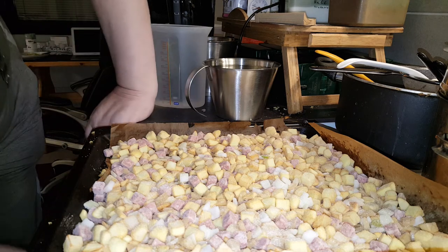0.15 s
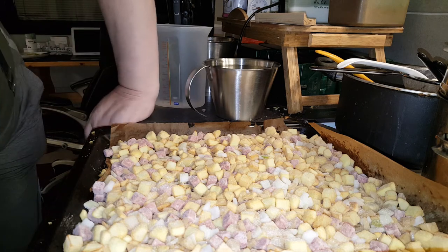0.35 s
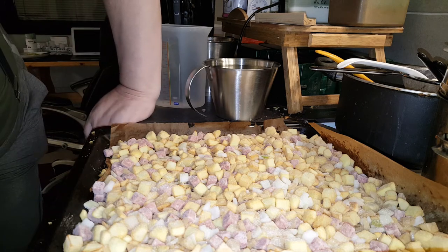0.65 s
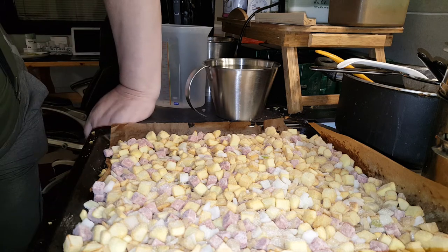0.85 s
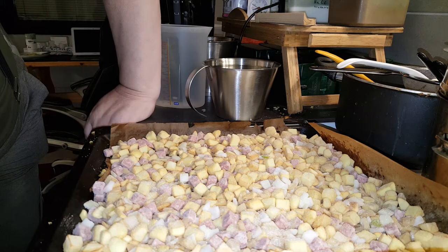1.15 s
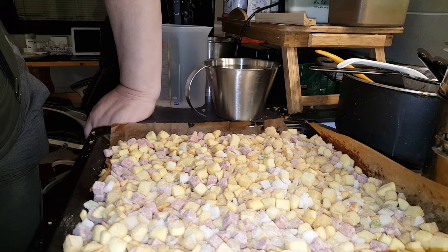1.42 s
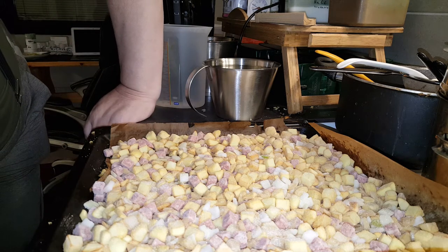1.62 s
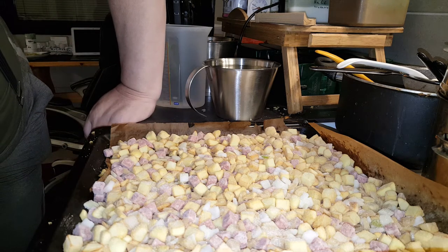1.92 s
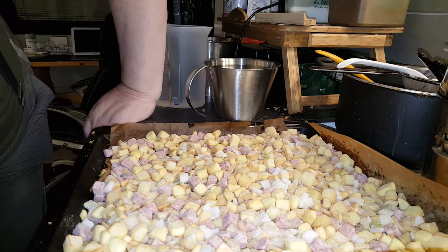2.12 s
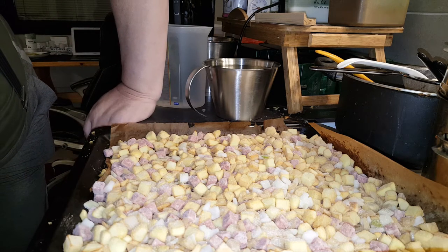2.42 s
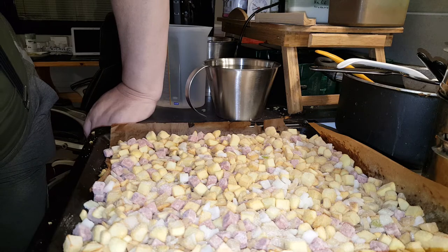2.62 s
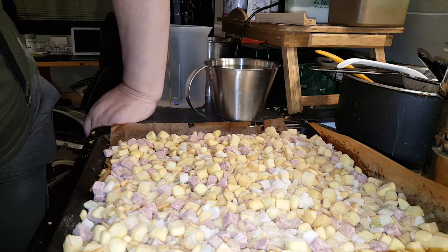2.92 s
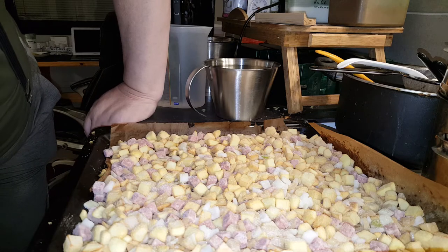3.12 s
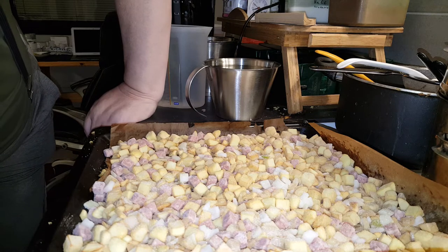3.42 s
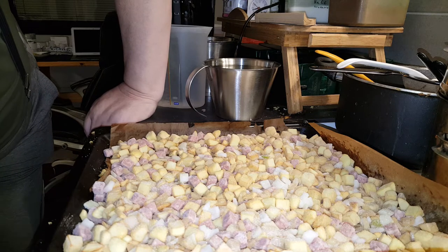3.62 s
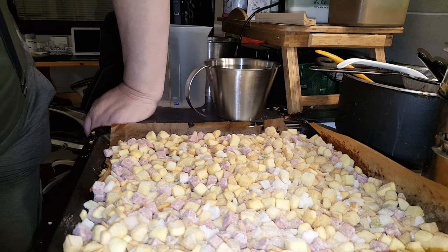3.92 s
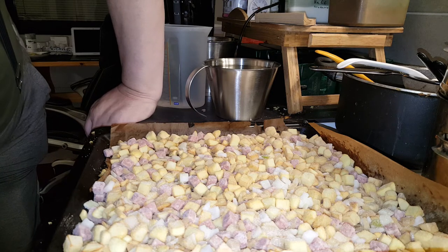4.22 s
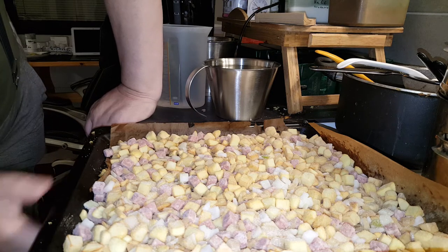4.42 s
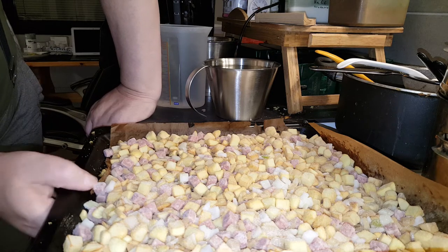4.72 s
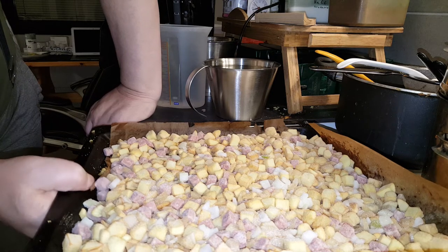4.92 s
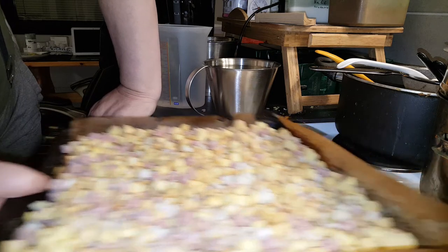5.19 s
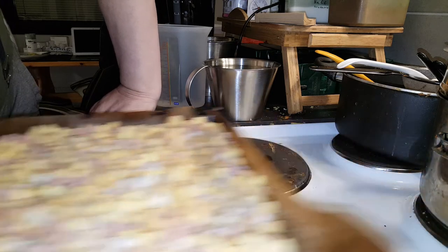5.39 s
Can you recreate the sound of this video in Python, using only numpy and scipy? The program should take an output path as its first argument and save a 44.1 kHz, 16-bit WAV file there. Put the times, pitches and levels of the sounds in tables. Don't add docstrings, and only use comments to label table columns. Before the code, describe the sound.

Stereo microphones sit beside a baking tray in a reverberant kitchen. The first two seconds hold distant, echoing clatter: hollow plastic jug, bouncing objects, low cabinet thuds, then a hard door slam. A near-quiet stretch has faint cloth rustles and light taps over hum and hiss. In the last second, dry close paper crinkles, metal knocks and a short rough drag end it.

```python
import sys
import numpy as np
from scipy import signal
from scipy.fft import rfft, irfft, next_fast_len
from scipy.io import wavfile
from scipy.ndimage import uniform_filter1d, map_coordinates

SR = 44100
rng = np.random.default_rng(int(sys.argv[2]) if len(sys.argv) > 2 else 0)


def voltage_ratio(level):
    return 10 ** (np.asarray(level, float) / 20)


def unload_audio(sound):
    columns = np.transpose(np.atleast_2d(sound))
    steps = np.round(np.clip(columns, -1, 1) * 32767)
    wavfile.write(sys.argv[1], SR, steps.astype(np.int16))


N = 244755

# t/s, peak level/dB, brightness/dB, share of room decay (0-1)
JUG_HITS = [
    (0.7975, -28.5, 6, 0.01),
    (0.802, -26, 5, 0.35),
    (0.86, -35, 3, 1),
    (0.899, -43.5, -2, 1),
]
# f/Hz, level/dB per Hz
JUG = [(71, -32), (120, -14), (188, 1.5), (255, -9.5), (353, -15), (450, -12.5), (899, -16.5), (1590, -6.5),
       (1760, -22), (2070, -9.5), (2920, -29), (3810, -31), (5490, -48), (6330, -44), (15500, -62)]
# f/Hz, level/dB, t60/s
JUG_RING = [(504, -15, 0.12), (824, -6.5, 0.076), (1275, -0.5, 0.35), (1521, -3, 0.6), (1935, -4, 0.12),
            (2252, -9.5, 0.58), (3843, -13.5, 0.15), (6400, -20, 0.12), (6900, -28, 0.098),
            (6540, -22, 0.096)]


def jug():
    return contacts(JUG_HITS, JUG, JUG_RING, ring_db=-43.5, wet_db=6.0, level_db=14.5, pan_db=13.0,
                    order=-8, soft_s=0.004, sag=0.44, heavy=0.057)


# start t/s, end t/s, first f/Hz, last f/Hz, level/dB
ROCK = (0.85, 0.915, 165, 330, -39)


def rocking():
    start, end, low_hz, high_hz, db = ROCK
    u = np.linspace(0, 1, round((end - start) * SR))
    pitch_hz = low_hz * (high_hz / low_hz) ** u ** 1.4
    envelope = np.sin(np.pi * u ** 0.7) * voltage_ratio(2.5 * np.cos(2 * np.pi * 2.6 * u))
    note = envelope * np.sin(2 * np.pi * np.cumsum(pitch_hz) / SR)
    out = np.zeros((2, N))
    add(out, voltage_ratio(db) * note * np.ones((2, 1)), start)
    return out


# t/s, peak level/dB, brightness/dB, share of room decay (0-1)
RATTLE = [
    (1.086, -24.5, -1, 0.52),
    (1.104, -30.5, -9.5, 1),
    (1.229, -49.5, -7, 0.79),
    (1.439, -56.5, -13.5, 0.94),
]
# t/s, peak level/dB, brightness/dB, share of room decay (0-1)
CLUMP = [
    (1.156, -29.5, -26, 0.4),
    (1.166, -40.5, -23, 0.36),
    (1.189, -37.5, -14.5, 0.69),
    (1.205, -42, -17, 0.8),
]
# f/Hz, level/dB per Hz
CLATTER = [(71, -0.5), (120, 0.5), (166, -6), (260, -6), (360, 2), (423, -6.5), (829, 1.5), (1490, -7),
           (3660, -6), (8080, -11.5), (15500, -35)]
# f/Hz, level/dB, t60/s
GLASS_RING = [(970, -2, 1), (3905, 0.5, .4), (635, 2.5, 0.26)]
# f/Hz, level/dB, t60/s
CLUMP_RING = [(841, -0.5, 0.3), (1080, -5.5, 0.12), (610, -5, 0.12)]


def rattle():
    first = contacts(RATTLE, CLATTER, GLASS_RING, ring_db=-49.0, wet_db=12.5, level_db=8.0, pan_db=10.0,
                     order=-10, soft_s=0.0038, sag=-.05, heavy=0.17)
    second = contacts(CLUMP, CLATTER, CLUMP_RING, ring_db=-38, wet_db=13, level_db=8.0, pan_db=9.0,
                      order=-10, soft_s=0.0059, sag=-.05, heavy=0.17)
    return first + second


# t/s, peak level/dB, brightness/dB, share of room decay (0-1)
SLAM = [
    (1.538, -46, 14.5, 0.95),
    (1.562, -17.5, -2.5, 0.65),
    (1.653, -31, -39, 0.3),
    (1.977, -45.5, 1.5, 0.19),
    (1.986, -45, 0.5, 0.39),
]
# f/Hz, level/dB per Hz
DOOR = [(71, -60.5), (120, -16.5), (166, -14.5), (235, -31), (339, -6.5), (450, -14.5), (649, -12),
        (1120, -15.5), (1450, -14.5), (2590, -17), (8250, -39), (9910, -49), (15500, -45.5)]
# f/Hz, level/dB, t60/s
DOOR_RING = [(400, -6, 0.3), (635, 8, 0.25), (685, 4, 0.25), (845, 9, 0.1), (1420, 4, 0.25),
             (1599, 2, 0.25), (1911, -5, 0.2), (2153, -4, 0.2), (2304, -1, 0.25), (2379, -1, 0.3),
             (2590, -5, 0.2), (2907, -3, 0.15)]


def door():
    return contacts(SLAM, DOOR, DOOR_RING, ring_db=-52.0, wet_db=12.5, level_db=12.5, pan_db=4.5,
                    order=-15, soft_s=0.0046, sag=0.061, heavy=-0.24)


# t/s, peak level/dB, t60/s
LATCH = (1.5627, -11.5, .004)
# f/Hz, level/dB per Hz
CATCH = [(900, -28.5), (2600, 2.5), (3600, -2.5), (8300, -11.5), (10000, -30), (15500, -26)]


def latch():
    out, t = np.zeros((2, N)), np.arange(SR // 50) / SR
    s, db, t60 = LATCH
    crack = rng.standard_normal(len(t)) * voltage_ratio(-60 * t / t60) * (1 - np.exp(-t / 0.0009))
    crack = np.convolve(crack, causal(lambda hz: along(CATCH, hz))[:512])
    crack /= np.max(np.abs(crack))
    add(out, voltage_ratio(db) * crack * voltage_ratio([[0], [-11]]), s)
    return out


# (drive of modes 2-4, level/dB), then rows of t/s, first mode level/dB, last mode level/dB
THUDS = [
    ((-6.5, -7.5, -0.5), [(0.974, -39, -0.5), (1.984, -58, 3), (3.468, -56.5, 10), (4.951, -47.5, 9)]),
    ((-10.5, -27, -23), [(0.603, -49, -1), (0.859, -38.5, -0.5)]),
    ((-10, -2, -1.7), [(1.65, -29, -5)]),
    ((-24.5, 5, -8.5), [(0.8, -35, -5.5), (1.065, -35, 0.5), (1.564, -42, 19.5)]),
    ((0.82, 12.3, 10.2), [(4.886, -49.5, 5), (5.199, -54.5, 2.5)]),
]
# f/Hz, t60/s, build-up/s
CABINET = [(106.26, 0.72, 0.015), (49.3, 1, 0.02), (166.3, 0.22, 0.017), (230, 0.39, 0.016),
           (342.5, 0.42, 0.012)]


def thuds():
    out, t = np.zeros((2, N)), np.arange(SR * 9 // 10) / SR
    size = np.array([[1], [.4], [.3]])
    for (floor, panel, shelf), rows in THUDS:
        for s, db, last in rows:
            for (hz, t60, build_s), strike_db in zip(CABINET, [0, floor, panel, shelf, last]):
                detune = 1 + 0.035 * rng.standard_normal((3, 1))
                detune[0] = 1
                ring = voltage_ratio(db + strike_db - 5 - 60 * t / t60) * (1 - np.exp(-t / build_s)) ** 2
                skews = hz / 700 * rng.standard_normal((2, 3, 1))
                for port, skew in enumerate(skews):
                    cluster = np.sum(size * np.sin(2 * np.pi * hz * detune * t + skew), axis=0)
                    add(out[port:port + 1], (ring * cluster)[None], s)
    return out


# t/s, peak level/dB, brightness/dB, share of room decay (0-1)
GRABS = [
    (4.881, -37.5, 11, 0),
    (4.899, -42, 2, 0.15),
    (4.928, -40.5, 12, 0.4),
    (4.945, -41, 21, 0.15),
]
# f/Hz, level/dB, t60/s
GRAB_RING = [(207, 4, 0.3), (300, -1, 0.12), (476, -12, 0.068)]
# t/s, peak level/dB, brightness/dB, share of room decay (0-1)
TRAY_HITS = [
    (4.9635, -20.5, -0.5, 0.24),
    (5.011, -36, -20, 1),
    (5.037, -33.5, -17.5, 0.33),
]
# f/Hz, level/dB per Hz
STEEL = [(88, -17), (150, -16.5), (519, 0.5), (877, -7.5), (1290, -6), (3100, -19.5), (4750, -27.5),
         (6600, -35), (7710, -26.5), (10500, -49), (15500, -40)]
# f/Hz, level/dB, t60/s
TRAY_RING = [(202.7, -3.5, 0.33), (297.6, 3.5, 0.18), (377, -13, 0.2), (504, -0.5, 0.32), (735, -2, 0.029),
             (1297, 3.5, 0.079), (1430, -11, 0.28), (2770, -19, 0.3)]
# t/s, peak level/dB, brightness/dB, share of room decay (0-1)
SKIDS = [
    (5.085, -34, 0, 0.07),
    (5.108, -34.5, 0, 0.07),
    (5.184, -36.5, -6, 0.07),
    (5.224, -47, 0, 0.07),
]
# f/Hz, level/dB per Hz
SKID = [(120, -29), (380, 2), (700, -9), (2000, -37), (15500, -74)]
# f/Hz, level/dB, t60/s
SKID_RING = [(388, -1.5, 0.085)]


def tray_knocks():
    out = contacts(TRAY_HITS, STEEL, TRAY_RING, ring_db=-37.5, wet_db=0.5, level_db=13.0, pan_db=1,
                   order=7, soft_s=0.0014, sag=0.57, heavy=0.13)
    out += contacts(SKIDS, SKID, SKID_RING, ring_db=-16.5, wet_db=3, level_db=10.0, pan_db=-3,
                    order=7, soft_s=0.0029, sag=0, heavy=0)
    out += contacts(GRABS, STEEL, GRAB_RING, ring_db=-31, wet_db=5.0, level_db=8.5, pan_db=-2.0,
                    order=7, soft_s=0.0028, sag=-0.18, heavy=0.12)
    return out


# t/s, scrape level/dB, brightness/dB, share of tray off the hob (0-1)
DRAG = [(5.045, -68, -23, 0), (5.075, -41, -23, 0), (5.105, -42.5, -19.5, 0.02), (5.148, -52.5, -23, 0.4),
        (5.165, -41.5, -21, 0.9), (5.195, -37, -23.5, 0.95), (5.228, -39, -9, 1), (5.27, -53.5, -18, 0.98),
        (5.34, -64, -19, 1)]
# f/Hz, level/dB per Hz
SLIDE = [(100, -16), (200, -19), (400, -7.5), (900, -6), (2000, -8.5), (3200, -8.5), (5000, -18.5),
         (6500, -29.5), (8000, -25.5), (9500, -37.5), (15500, -38.5)]
# f/Hz, width/Hz, level/dB
TRAY_ON = [(996, 40, -5), (1290, 90, 5), (2070, 70, -10), (2720, 50, -4), (3050, 31, -8), (3730, 33, -13),
           (5060, 41, -19), (5900, 80, -12), (6550, 32, -28)]
# f/Hz, width/Hz, level/dB
TRAY_OFF = [(1185, 50, -5), (1780, 27, -1), (2054, 64, -4), (2210, 31, -1), (2490, 24, -13),
            (3240, 62, -21), (3860, 42, -7), (4180, 72, -10), (4800, 50, -3), (7600, 170, -15)]


def tray():
    s, _, top_db, off = np.transpose(DRAG)
    t = np.arange(N) / SR
    top_db, off = np.interp(t, s, top_db), np.interp(t, s, off)
    slips = grains(rate=5200, spread_db=0.8) * voltage_ratio(2.2 * wobble(160))
    slips = signal.fftconvolve(slips, causal(lambda hz: along(SLIDE, hz)))[:N]
    on = unit(filtered(slips, resonances(TRAY_ON, plain=0.29)))
    free = unit(filtered(slips, resonances(TRAY_OFF, plain=0.4)))
    slips = np.sqrt(1 - off) * on + np.sqrt(off) * free
    low = unit(filtered(slips, lambda hz: 1 / (1 + (hz / 5200) ** 4)))
    high = unit(filtered(slips, lambda hz: 1 - 1 / (1 + (hz / 5000) ** 4)))
    scrape = curve(DRAG) * (low + voltage_ratio(top_db) * high)
    space = room(share=0.22, wet_db=1.5, lag=-6, soft=0.0029)
    return voltage_ratio(-3.5) * signal.fftconvolve(scrape[None], space, axes=1)[:, :N]


# t/s, crackle level/dB
GRIP = [
    (4.762, -57),
    (4.829, -59.5),
    (4.91, -65),
    (4.99, -68.5),
]
# t/s, peak level/dB
SNAPS = [
    (4.7341, -65),
    (4.7478, -50.5),
    (4.809, -50.5),
    (4.847, -44.5),
    (4.944, -57),
]
# f/Hz, level/dB per Hz
PAPER = [(240, -14), (450, -2.5), (900, -11), (1500, -4), (2300, -8), (3400, -9.5), (8300, -17),
         (9700, -23), (12500, -18.5), (15800, -18)]


def paper():
    effort = sum(swell(s, db, rise_db_s=412, fall_db_s=135.5) for s, db in GRIP)
    crackle = effort * unit(grains(rate=3600, spread_db=1.0) * voltage_ratio(4.3 * wobble(70))) * voltage_ratio(3.0)
    crackle = signal.fftconvolve(crackle, causal(lambda hz: along(PAPER, hz)))[:N]
    snap_colour = [(2500, -44.0), (9000, -6), (13000, 8), (15800, 3.5), (17000, -45)]  # f/Hz, level/dB
    snap = causal(lambda hz: along(snap_colour, hz))
    for s, db in SNAPS:
        crackle[round(s * SR):][:len(snap)] += voltage_ratio(db + 14.5) * snap
    space = room(share=0.067, wet_db=3.0, lag=-6)
    return voltage_ratio(-2.0) * signal.fftconvolve(crackle[None], space, axes=1)[:, :N]


# t/s, peak level/dB, brightness/dB, share of room decay (0-1)
CREASES = [
    (4.751, -42, 10, 0.1),
    (4.7653, -33, 1.5, 0.15),
    (4.8094, -45.5, 7, 0.15),
    (4.8474, -32.5, 2, 0.091),
    (4.8793, -55, 19, 0.24),
]


def creases():
    return contacts(CREASES, PAPER, [], ring_db=0, wet_db=8.0, level_db=0, pan_db=5.0,
                    order=-6, soft_s=0.0015, sag=0.99, heavy=.1)


# t/s, peak level/dB, brightness/dB, share of room decay (0-1)
NUDGES = [(0.606, -47, 6, 0.52), (0.643, -47.5, 6.5, 0.37), (0.76, -52, 14, 0.74), (0.976, -40, 12.5, 0.92),
          (0.998, -34.5, 9.5, 1), (1.047, -30.5, -2, 0.56), (1.065, -33, -4.5, 0.18), (2.379, -56, 2, 0.11)]
# f/Hz, level/dB per Hz
DULL = [(88, -35.5), (150, -3.5), (268, -19.5), (396, -9), (550, -10), (2700, -16.5), (3220, -23),
        (8170, -49.5), (9540, -53.5), (15500, -63.5)]


def nudges():
    return contacts(NUDGES, DULL, [], ring_db=0, wet_db=12.5, level_db=7.5, pan_db=-8.0,
                    order=-10, soft_s=0.0012, sag=0.35, heavy=1.0)


# t/s, peak level/dB, brightness/dB, share of room decay (0-1)
TAPS = [(3.468, -36.5, -2, 0.25), (3.509, -53, 1.5, 0.55), (3.596, -44.5, -12, 0.46),
        (3.639, -49, 14, 0.28), (3.727, -50.5, 1, 0.18), (3.978, -38, 3, 0.28), (3.988, -40, -2, 0.48)]
# f/Hz, level/dB per Hz
TAPPED = [(120, -28.5), (200, -7), (506, -4), (742, 6), (974, -1.5), (1620, 2), (1950, -8.5), (3550, -10),
          (5590, -21), (7760, -24.5), (9830, -35), (15500, -29)]
# f/Hz, level/dB, t60/s
TAP_RING = [(300, 0, 0.091), (753, -5, 0.094), (1382, 0, 0.056), (1646, 2.5, 0.071), (2633, 0, 0.055)]


def taps():
    return contacts(TAPS, TAPPED, TAP_RING, ring_db=-33.0, wet_db=10.5, level_db=6.0, pan_db=8.0,
                    order=-10, soft_s=0.0012, sag=0.44, heavy=0.13)


# t/s, peak level/dB, brightness/dB, share of room decay (0-1)
RUSTLES = [(2.255, -63.5, -3.5, 0.55), (2.47, -78, 1, 0.6), (2.56, -70, 2, 0.7), (2.775, -62.5, 3, 0.2),
           (2.8, -69, 2, 0), (2.991, -56.5, -4, 0.18), (3.011, -57.5, -0.5, 0.1), (3.035, -64, -10, 0.2),
           (3.332, -56, 1.5, 0.13), (3.35, -57, 1, 1)]
# f/Hz, level/dB per Hz
RUSTLE = [(300, -25), (1200, -10), (1550, 1.5), (3100, -1.5), (4500, -8), (7500, -14.5), (10600, -27.5),
          (15500, -23.5)]


def rustles():
    return contacts(RUSTLES, RUSTLE, [], ring_db=0, wet_db=13.0, level_db=10.0, pan_db=6.0,
                    order=-10, soft_s=0.004, sag=0.05, heavy=0.05)


# t/s, peak level/dB, brightness/dB, share of room decay (0-1)
TICKS = [(0.004, -57.5, -3.5, 0.36), (0.036, -60, 4, 1), (0.249, -63, 3, 1), (2.663, -64, -2, 1),
         (3.612, -54, 10.5, 0.3), (4.001, -51, 5.5, 0.43), (4.614, -61, 10, 1)]
# f/Hz, level/dB per Hz
SMALL = [(120, -45), (200, -11), (554, -5.5), (842, -10), (974, -9), (2470, -2.5), (2700, -2), (4330, -11),
         (7350, -15.5), (10600, -23.5), (15500, -18)]


def ticks():
    return contacts(TICKS, SMALL, [], ring_db=0, wet_db=14.5, level_db=11.5, pan_db=9.0,
                    order=-10, soft_s=0.0017, sag=-0.31, heavy=-0.34)


# multiple of shaft rate, rms level/dB
HUM = [(1, -63.5), (2, -70.5), (3, -82), (4, -75.5), (6, -95), (8, -99), (15.12, -81)]


def fridge():
    shaft_hz = 49.03
    turns = 2 * np.pi * shaft_hz * np.arange(N) / SR + 0.25 * wobble(2.2)
    hum = np.zeros(N)
    for k, db in HUM:
        level = np.sqrt(2) * voltage_ratio(db + 0.09 * k ** 0.47 * wobble(4.7))
        hum += level * np.sin(k * turns + 0.48 * k * k)
    return hum


# t/s, level/dB
STIR = [(0, -67.5), (.3, -67.5), (.55, -68), (1.45, -63), (2.1, -65), (2.35, -67.5), (2.6, -65.5),
        (2.85, -68), (3.15, -68.5), (3.4, -65.5), (3.85, -69.5), (4.2, -68.5), (4.55, -70.5), (5.4, -64.5),
        (5.55, -69.5)]
# f/Hz, level/dB per Hz
AIR = [(44, -37), (75, -5), (135, -12), (178, -8), (247, -14), (413, -10), (487, -17), (665, -17),
       (729, -18.5), (1090, -19.5), (3460, -27), (3720, -28), (6000, -38), (7800, -65), (13200, -120)]
# f/Hz, level/dB per Hz
HISS = [(2350, 2.5), (4000, -18.5), (5550, -0.5), (7070, 3), (7660, 1.5), (11100, -3.5), (14600, 4),
        (15800, 2)]


def air():
    z = signal.stft(rng.standard_normal((2, N)), nperseg=512)[2]
    patches = uniform_filter1d(rng.standard_normal(z.shape[1:]), size=6, axis=0)
    patches = uniform_filter1d(patches, size=14, axis=1)
    noise = diffuse(signal.istft(z * voltage_ratio(.9 * unit(patches)), nperseg=512)[1][:, :N])
    low = unit(filtered(noise, lambda hz: voltage_ratio(along(AIR, hz))))
    hiss = unit(filtered(rng.standard_normal((2, N)), lambda hz: voltage_ratio(along(HISS, hz)) * (hz < 15830)))
    return voltage_ratio(3) * curve(STIR) * voltage_ratio(2.1 * wobble(6.67)) * low + voltage_ratio(-78.0) * hiss


def contacts(rows, colour, modes, ring_db, wet_db, level_db, pan_db, order, soft_s, sag, heavy):
    longest_s = max([row[2] for row in modes] + [0])
    out, t = np.zeros((2, N)), np.arange(round(SR * np.clip(.7 * longest_s, .1, .5))) / SR
    hardest_db = max(row[1] for row in rows)
    for s, db, top_db, share in rows:
        lost_db = hardest_db - db
        tilt = [(350, sag * lost_db + heavy * top_db), (900, 0.024), (2500, 0), (6000, top_db)]
        blow = causal(lambda hz: along(colour, hz) + along(tilt, hz))
        blow = np.pad(blow, (0, len(t)))[:len(t)]
        for hz, mode_db, t60 in modes:
            mode_db = mode_db + along(tilt, hz) + ring_db + rng.normal(0, 1.9)
            size = voltage_ratio(mode_db - 60 * t / min(t60, .9))
            blow += size * (1 - np.exp(-t / 0.0013)) * np.sin(2 * np.pi * hz * t)
        soft = soft_s * voltage_ratio(0.2 * lost_db)
        space = room(max(share, .1), wet_db, order, soft, pan_db)
        add(out, voltage_ratio(db + level_db) * signal.fftconvolve(blow[None], space, axes=1), s)
    return out


# f/Hz, t60/s
ROOM = [(100, 1), (400, 0.86), (1500, 0.83), (4000, 0.68), (8000, 0.71), (14000, 0.31)]
# t/s, level/dB
COUNTER = [
    (0, -6.5),
    (.0005, 5),
    (.0011, 0.5),
    (.0019, -2),
]


def room(share, wet_db, lag, soft=0.0044, pan_db=2):
    span = round(.75 * share * SR) + 2048
    noise = rng.standard_normal((3, span))
    hz, t, z = signal.stft(noise[:2], SR, nperseg=256)
    decay = voltage_ratio(-60 * t / (share * along(ROOM, hz)[:, None]))
    tail = signal.istft(z * decay, SR, nperseg=256)[1][:, :span]
    t = np.arange(span) / SR
    walls = 1 + 1.07 * np.exp(-t / 0.039) * voltage_ratio(5.2 * noise[2])
    tail = diffuse(tail * walls) * (1 - np.exp(-t / soft))
    tail *= voltage_ratio(wet_db) / np.linalg.norm(tail[0])
    front = voltage_ratio(np.clip(pan_db, -9, 9) * np.array([.5, -.5]))
    front /= 1 + (soft / 0.0022) ** 2
    arrival = np.array([max(lag, 0), max(-lag, 0)])
    for s, db in COUNTER:
        at = arrival + round(s * SR)
        tail[[0, 1], at] += 1.105 * voltage_ratio(db) * front
        tail[[0, 1], at + 1] -= 0.22 * voltage_ratio(db) * front
    return tail


# f/Hz, likeness (-1 to 1)
ALIKE = [(60, 1), (130, 0.5), (290, 0.92), (640, 0.32), (1410, -0.15), (3100, 0.034), (6820, -0.052),
         (15000, -0.11)]


def diffuse(pair):
    turn = lambda hz: np.arccos(np.clip(along(ALIKE, hz), -1, 1)) / 2
    mid, side = filtered(pair, lambda hz: np.array([np.cos(turn(hz)), np.sin(turn(hz))]))
    return np.array([mid + side, mid - side])


def resonances(peaks, plain):
    def response(f):
        total = plain
        for k, (centre, width, db) in enumerate(peaks):
            damping = 1j * f * width
            total = total + (-1) ** k * voltage_ratio(db) * damping / (centre * centre - f * f + damping)
        return total
    return response


def grains(rate, spread_db):
    slips = (rng.random(N) < rate / SR) * rng.standard_normal(N)
    return unit(slips * voltage_ratio(spread_db * rng.exponential(size=N)))


def swell(s, db, rise_db_s, fall_db_s):
    late = np.arange(N) / SR - s
    return voltage_ratio(db - np.where(late < 0, -rise_db_s * late, fall_db_s * late))


def wobble(rate):
    return map_coordinates(rng.standard_normal(int(N * rate / SR) + 4), [np.arange(N) * rate / SR])


def causal(db_of):
    ceps = irfft(np.log(voltage_ratio(db_of(np.fft.rfftfreq(4096, 1 / SR))) + 1e-6))
    ceps[1:2048] *= 2
    ceps[2049:] = 0
    pulse = irfft(np.exp(rfft(ceps)))
    return pulse / np.linalg.norm(pulse)


def filtered(x, response):
    m = next_fast_len(x.shape[-1] + 8192)
    return irfft(rfft(x, m) * response(np.fft.rfftfreq(m, 1 / SR)), m)[..., :x.shape[-1]]


def along(points, hz):
    f, v = np.transpose(points)
    return np.interp(np.log(hz + 1), np.log(f + 1), v)


def curve(rows):
    columns = np.transpose(rows)
    return voltage_ratio(np.interp(np.arange(N) / SR, columns[0], columns[1], -150, -150))


def unit(x):
    return x / np.sqrt(np.mean(x ** 2) + 1e-20)


def add(out, sound, s):
    at = round(s * SR)
    out[:, at:at + sound.shape[1]] += sound[:, :N - at]


def scene():
    far = jug() + rocking() + rattle() + door() + latch() + thuds()
    far += nudges() + taps() + rustles() + ticks()
    near = tray_knocks() + tray() + paper() + creases()
    near = filtered(near, lambda hz: hz < 15830)
    return far + near + fridge() + air()


def band_limit(x):
    return signal.sosfilt(signal.butter(12, 16640, fs=SR, output="sos"), x)


# f/Hz, left minus right level/dB
PORTS = [(60, -1.5), (110, -4), (200, -0.5), (380, -2), (700, 0.5), (1290, 1), (2380, 2), (4400, -4),
         (8120, 3), (15000, 1.5)]


def record(dry):
    tilt = np.array([[.5], [-.5]])
    ports = filtered(dry, lambda hz: voltage_ratio(along(PORTS, hz) * tilt) * (hz < 16600))
    mix = ports - .0005
    return band_limit(mix)


dry = scene()
out = record(dry)
unload_audio(out)
```